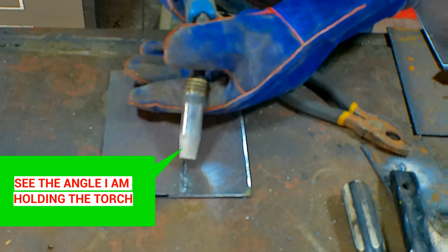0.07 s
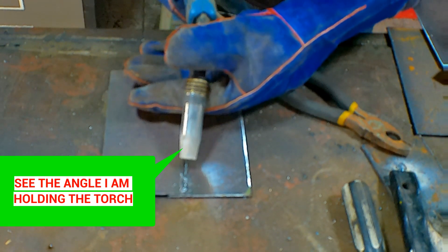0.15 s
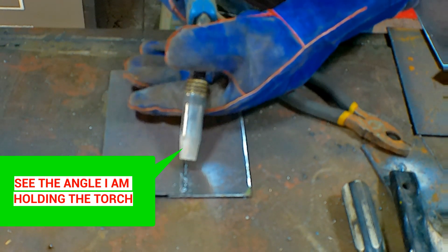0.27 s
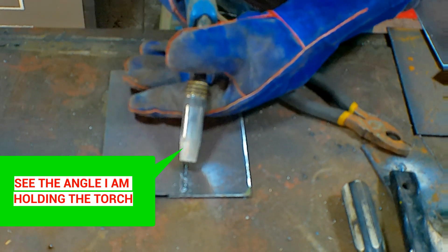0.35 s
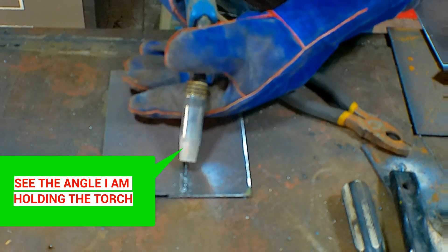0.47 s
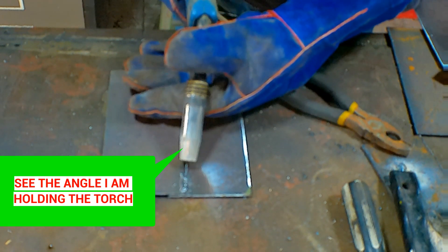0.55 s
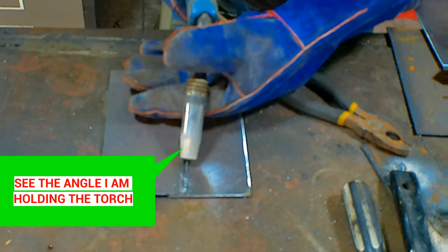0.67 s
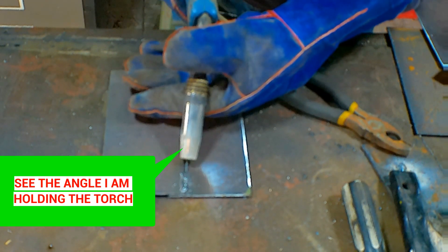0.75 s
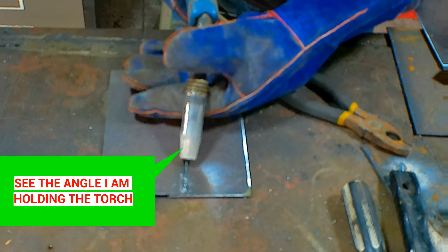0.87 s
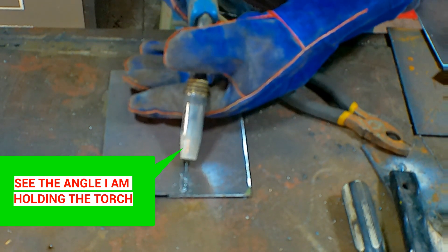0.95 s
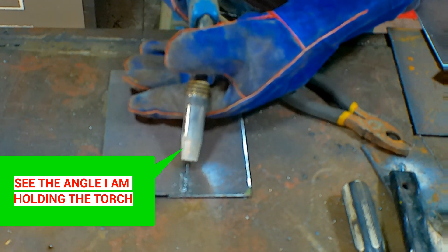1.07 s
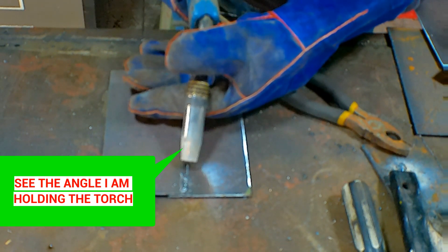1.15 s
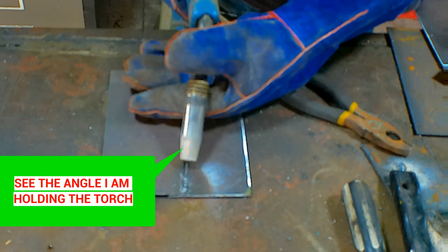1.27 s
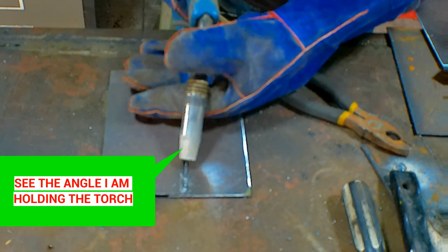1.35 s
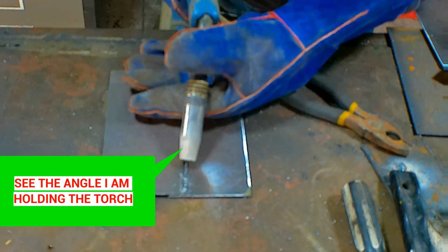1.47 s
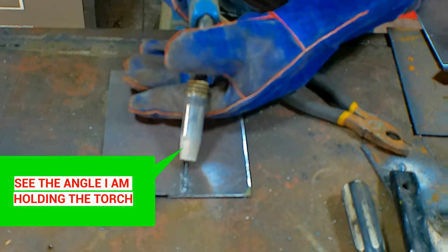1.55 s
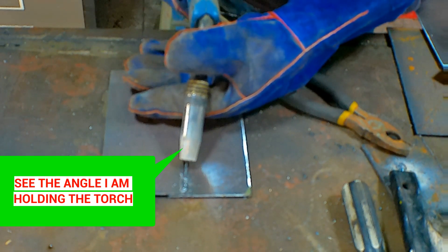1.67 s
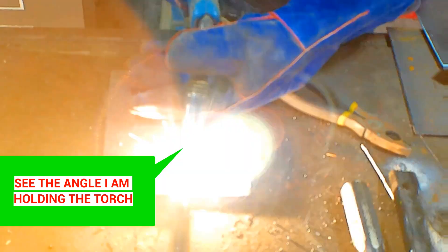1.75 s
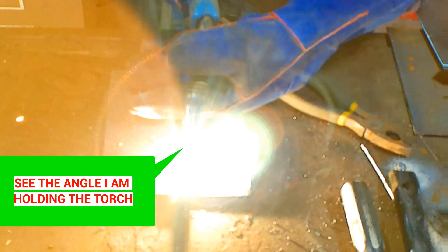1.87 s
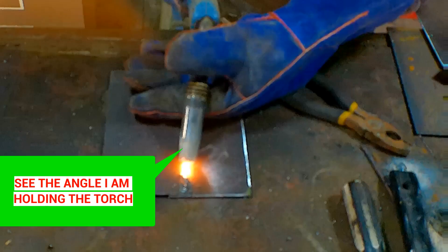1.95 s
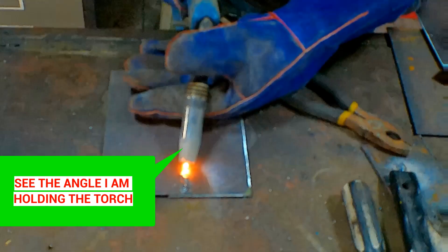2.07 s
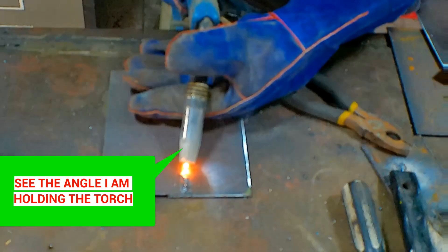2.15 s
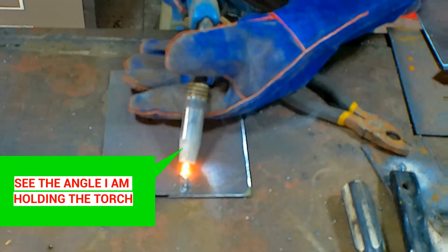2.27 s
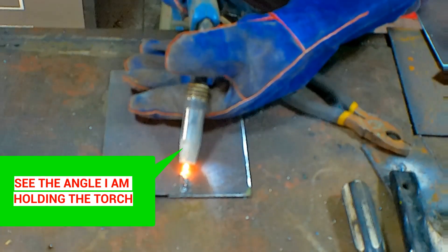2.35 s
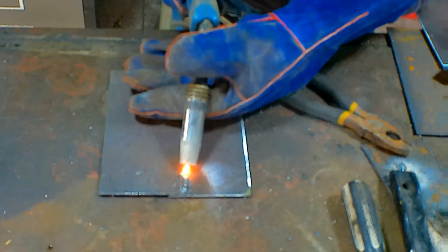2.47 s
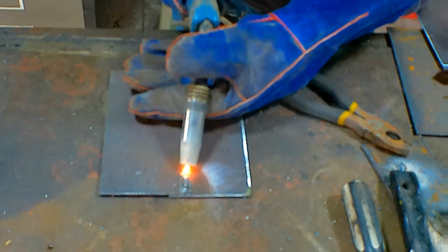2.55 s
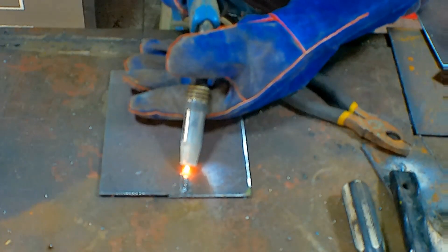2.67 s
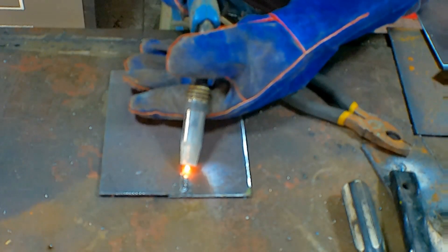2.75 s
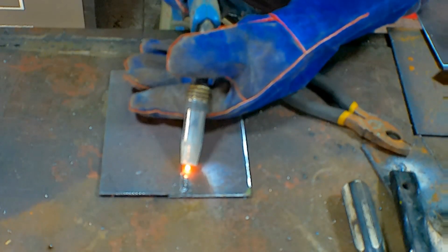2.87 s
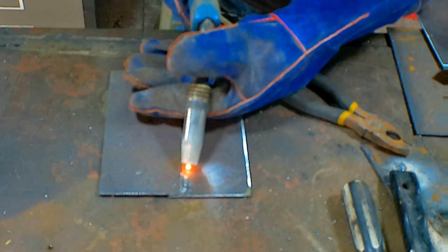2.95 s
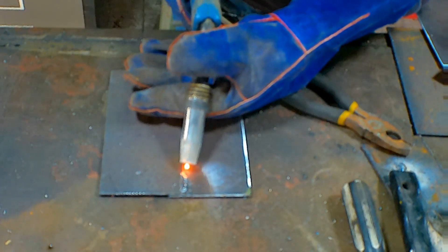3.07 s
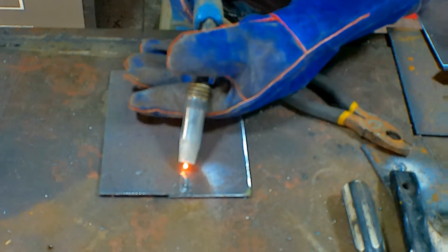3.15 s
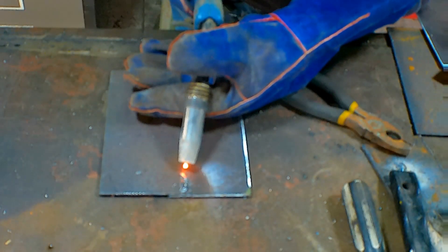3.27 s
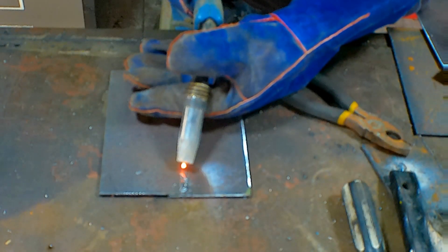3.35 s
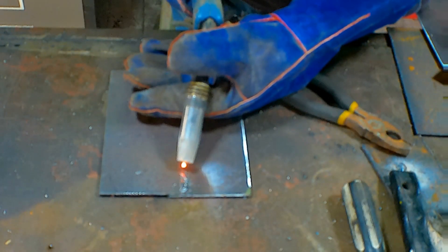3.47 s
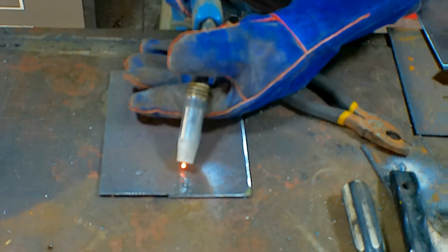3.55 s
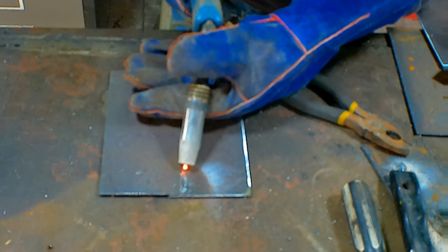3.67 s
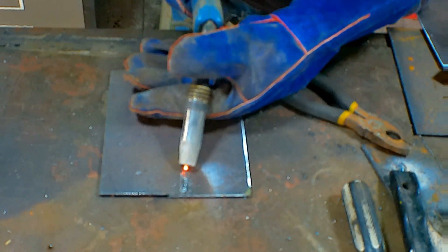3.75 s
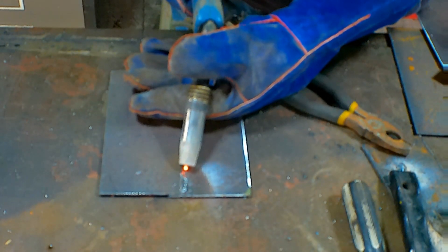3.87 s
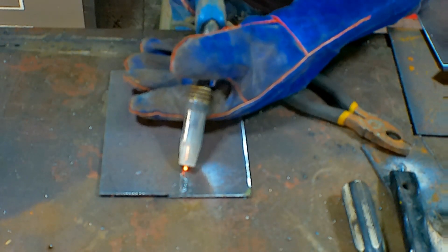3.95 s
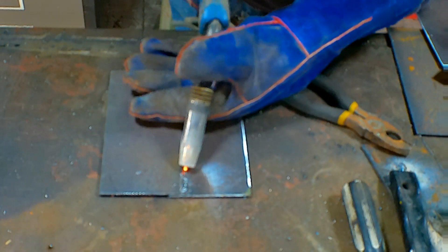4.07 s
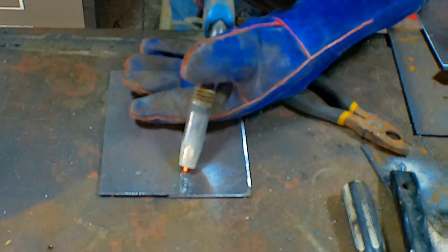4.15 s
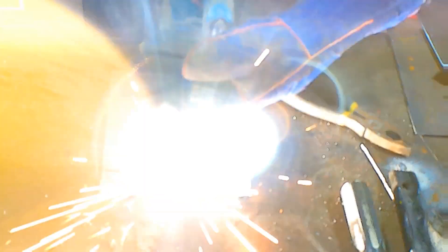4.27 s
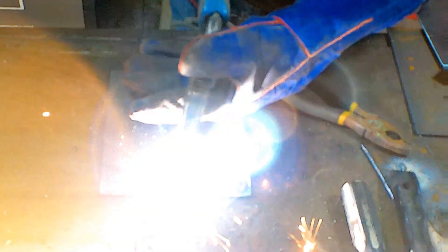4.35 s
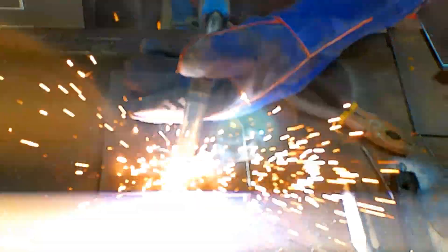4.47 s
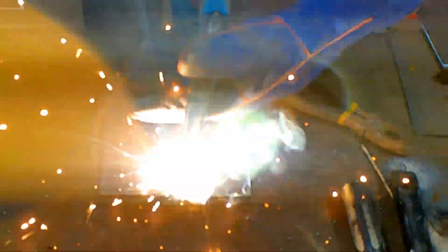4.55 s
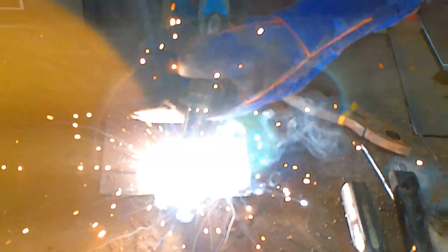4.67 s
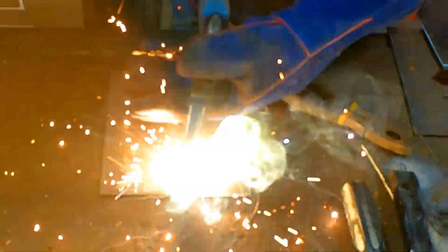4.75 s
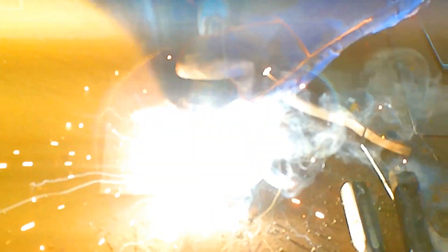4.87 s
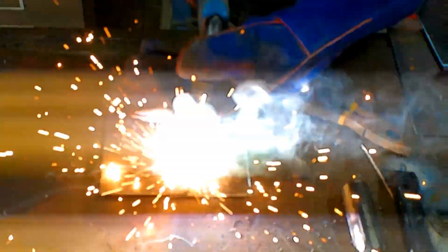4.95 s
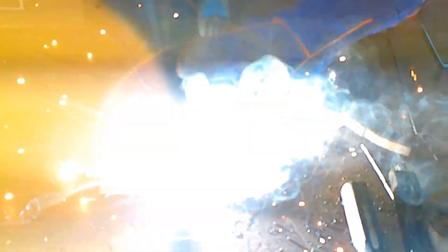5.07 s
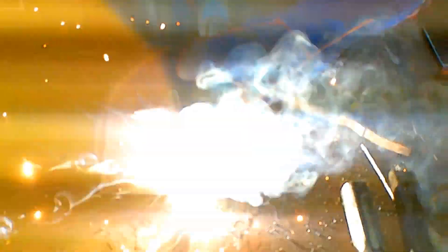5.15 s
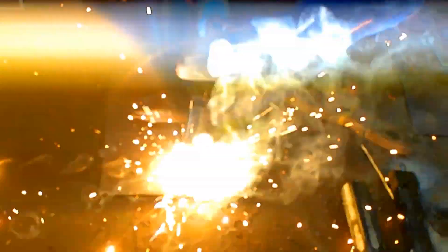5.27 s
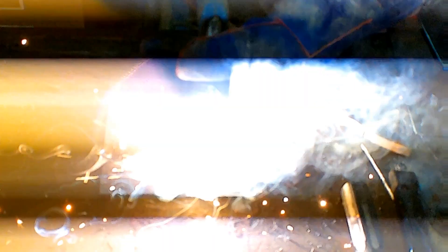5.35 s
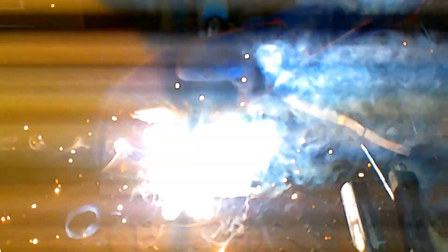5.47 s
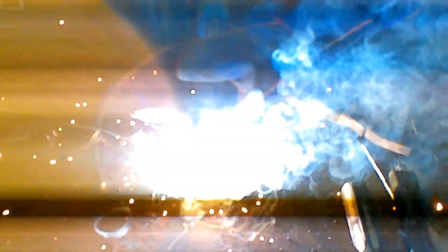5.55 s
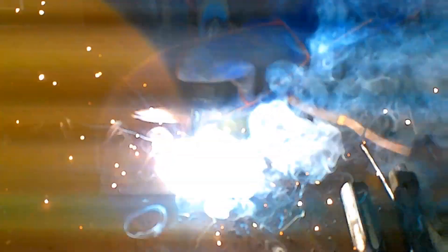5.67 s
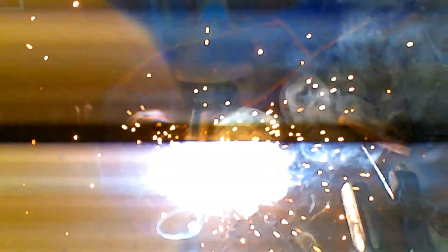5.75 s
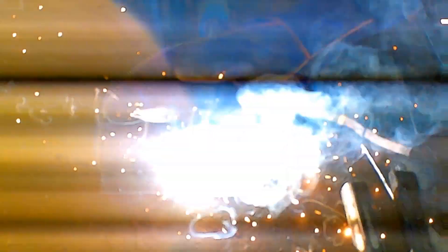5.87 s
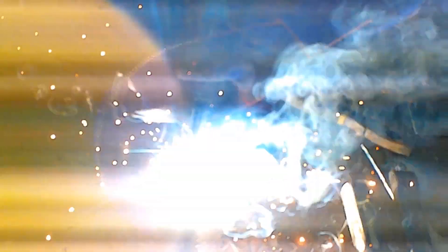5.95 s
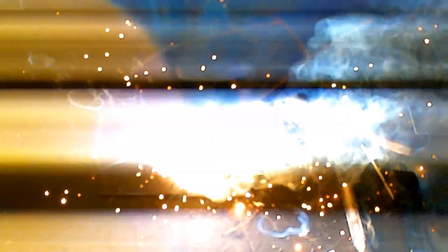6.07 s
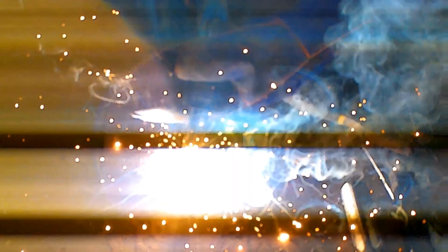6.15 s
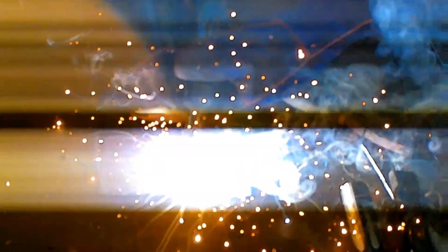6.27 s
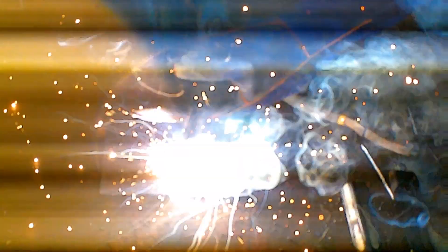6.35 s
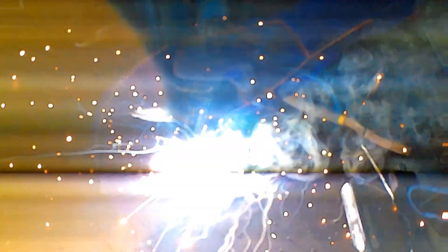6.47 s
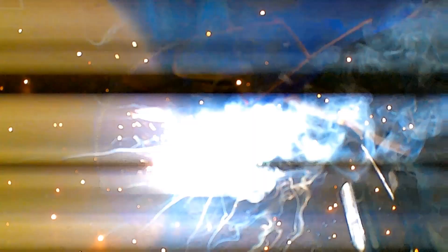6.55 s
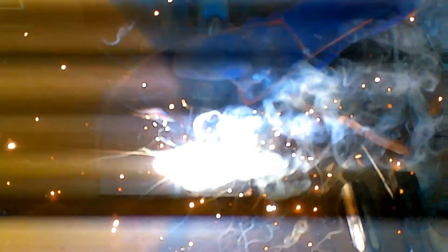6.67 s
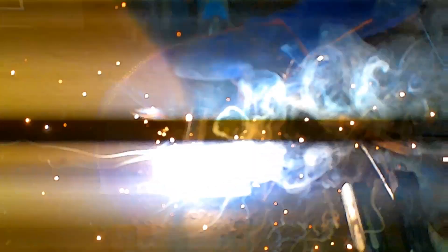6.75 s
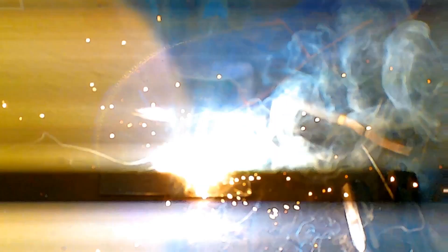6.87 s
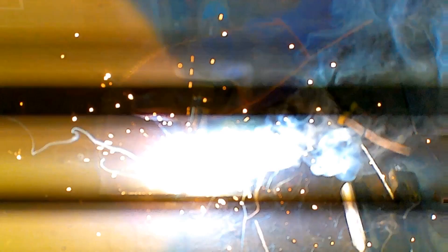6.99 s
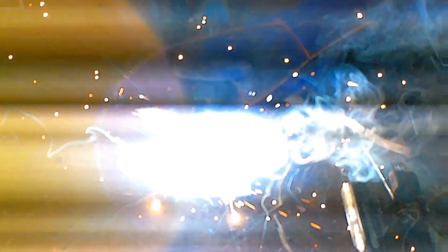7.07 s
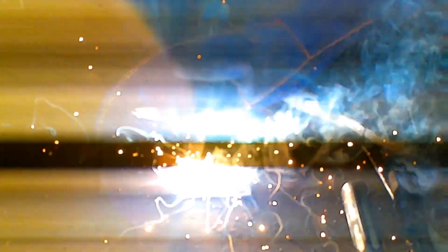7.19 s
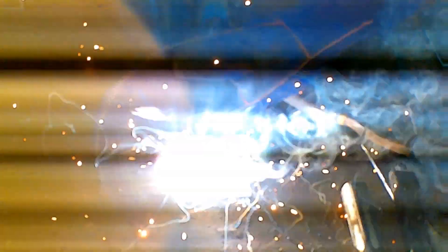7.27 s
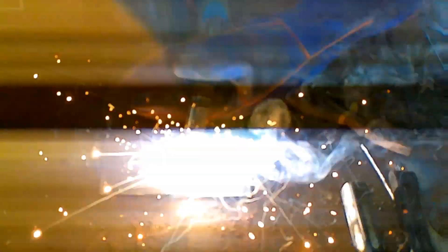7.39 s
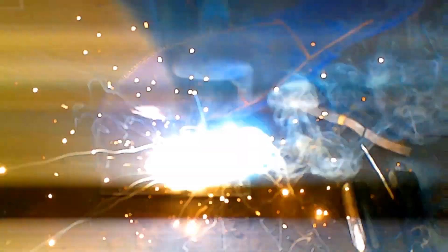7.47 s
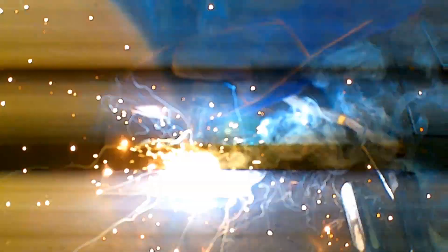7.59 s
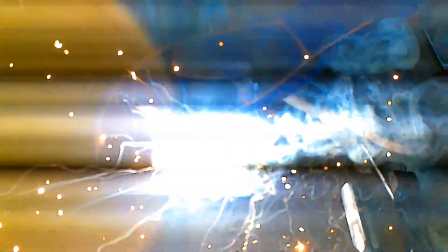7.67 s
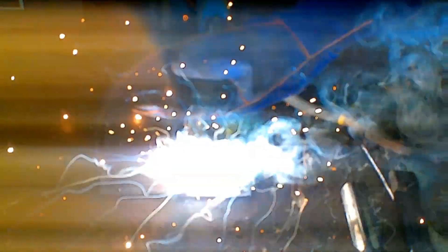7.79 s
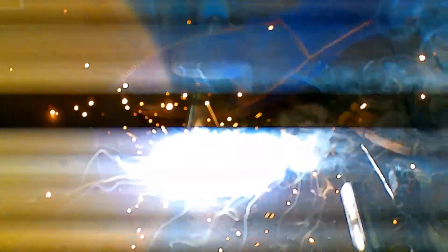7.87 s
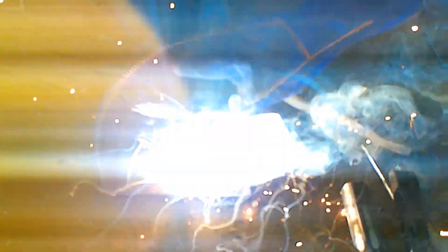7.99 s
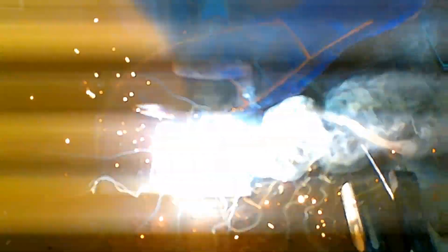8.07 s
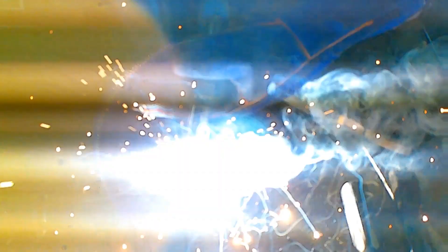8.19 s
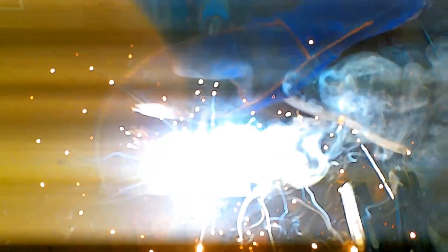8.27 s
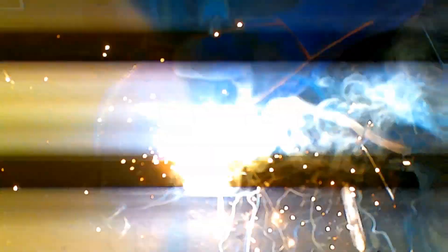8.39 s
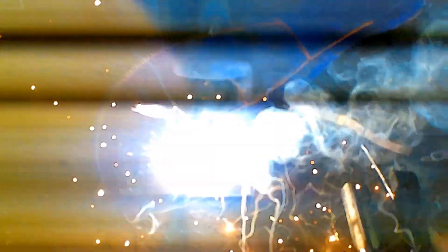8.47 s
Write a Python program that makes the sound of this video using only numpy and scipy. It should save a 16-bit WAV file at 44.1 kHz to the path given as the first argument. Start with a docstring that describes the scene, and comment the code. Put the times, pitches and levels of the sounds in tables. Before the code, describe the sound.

A low fan drone with light metallic ticks and two soft knocks, heard near a welding plate. One abrupt, explosive pop breaks the quiet, then the fan returns with a very faint high whine that drops out briefly. Later the arc bursts on, stuttering with gaps and loud distorted snaps, then becomes a continuous gritty frying buzz with stray big pops and brief lulls. Close microphone, short room reflections.

```python
"""Flux-core welding on a steel plate, heard close up in a workshop where a fan runs.
The torch is shifted into place, the wire strikes once and blows off with a bang; later the arc catches,
sputters and settles to a crackle. The arc is spikes, spray noise and fizz in one pulse colour.
Touches are noise bursts in resonances, the fan is coloured noise with hum, the whine is sine tones.
Plate, bench and room throw the arc back, and whatever overloads the input is cut flat."""
import sys
import numpy as np
from scipy import signal
from scipy.fft import rfft, irfft
from scipy.io import wavfile

SR = 44100
rng = np.random.default_rng(int(sys.argv[2]) if len(sys.argv) > 2 else 0)


def to_wav(sig):
    """Store sig (one row per channel, or 1-D mono) as 16-bit WAV at the path in sys.argv[1].

    Samples outside -1..1 are clipped; the rate is SR.
    """
    pcm = np.clip(np.atleast_2d(sig), -1, 1) * 32767
    pcm = np.round(pcm).astype(np.int16)
    wavfile.write(sys.argv[1], SR, pcm.T)  # frames by channels


N = 375732
TIME = np.arange(N) / SR


def amp(db):
    """Decibels to gain."""
    return 10 ** (np.asarray(db) / 20)


def evened(x):
    """Scales to rms 1."""
    return x / np.sqrt(np.mean(x ** 2) + 1e-20)


def read(points, hz):
    """Reads a table on a log-frequency axis."""
    f, value = np.transpose(points)
    return np.interp(np.log(hz + 1), np.log(f + 1), value)


def add(mix, s, sound):
    """Mixes a sound in at time s."""
    part = mix[max(round(s * SR), 0):][:len(sound)]
    part += sound[:len(part)]


def smooth(x, hz):
    """One-pole low-pass."""
    r = np.exp(-2 * np.pi * hz / SR)
    return signal.lfilter([1 - r], [1, -r], x)


def resonate(x, hz, width):
    """A resonance of gain 1."""
    return signal.lfilter(*signal.iirpeak(hz, hz / min(width, SR / 4), SR), x)


def drift(hz, size=2 ** 13):
    """Slow chance of rms 1, up to the given rate."""
    points = rng.standard_normal(size)
    return evened(np.interp(TIME * 2 * hz, np.arange(size), points))


def tones(lines, waver_hz, waver_db):
    """Lines with a quick jitter in pitch and a slow waver in strength."""
    out = np.zeros(N)
    for hz, db in lines:
        level = amp(db + waver_db * drift(hz=4.3))
        phase = 2 * np.pi * np.cumsum(hz + waver_hz * drift(hz=140)) / SR
        out += level * np.sqrt(2) * np.sin(phase)
    return out


def wander(x, response, count=4):
    """Hot air and the moving torch change the scattered paths: x fades between random responses."""
    shares = np.array([drift(hz=12) for _ in range(count)])
    shares /= np.linalg.norm(shares, axis=0)
    out = np.zeros(N)
    for share in shares:
        path = response()
        out += signal.oaconvolve(x * share, path / np.linalg.norm(path))[:N]
    return out


# ring of the workshop: pitch_hz, t60_s
ROOM_RING = [(150, 0.31), (600, 0.23), (1500, 0.23), (4000, 0.37), (9000, 0.23), (15000, 0.34)]


def workshop(first_s=0.0076):
    """Dense reflections that build up from the nearest wall, each band dying at its own speed."""
    hz, t, bands = signal.stft(rng.standard_normal(SR // 2), SR, nperseg=2 ** 8)
    dying = bands * amp(-60 * t / read(ROOM_RING, hz)[:, None])
    tail = signal.istft(dying, SR, nperseg=2 ** 8)[1]
    return tail * np.minimum(np.arange(len(tail)) / SR / first_s, 1) ** 3


# tone of the fan's rush: pitch_hz, relative_db (per Hz)
FAN_TONE = [(20, 5), (55, 0.5), (100, -0.5), (175, 4.5), (230, -1), (500, 2.5), (1150, -0.5), (1450, -7),
            (2300, -11), (3500, -16), (5000, -22), (7000, -28), (10000, -30), (15500, -31)]
# swell of the rush around its base level: time_s, swell_db
FAN_SWELL = [(0, -4.5), (1.6, -5.5), (2.1, -4), (4.2, -3.5)]
# hum of blades and motor, each line wavering: pitch_hz, level_db (rms before the waver)
FAN_HUM = [(177.6, -52), (253, -54.5), (290.7, -52), (403.7, -52), (506, -73), (602.9, -51), (866.7, -55.5),
           (1157, -68), (1206, -55)]


def fan(rush_db=-35, hum_db=0):
    """Rushing air is shaped noise with a slow swell; blades and motor hum in wavering tones."""
    spectrum = rfft(rng.standard_normal(N))
    rush = evened(irfft(spectrum * amp(read(FAN_TONE, np.fft.rfftfreq(N, 1 / SR))), N))
    swell_db = np.interp(TIME, *np.transpose(FAN_SWELL))
    hum = tones(FAN_HUM, waver_hz=0.84, waver_db=2.1)
    return amp(rush_db + swell_db) * rush + amp(hum_db) * hum


# thin electrical whine: pitch_hz, level_db (rms before the waver)
WHINE_LINES = [(4680, -64), (5410, -62.5), (7250, -69), (10584, -71)]
# when the whine is switched on: start_s, end_s
WHINE_SPANS = [(1.85, 3.07), (3.28, 4.2)]


def whine():
    """A faint, fuzzy whine of jittering tones that comes and goes while the arc is out."""
    on = sum((TIME > start) & (TIME < end) for start, end in WHINE_SPANS)
    return smooth(on, hz=8) * tones(WHINE_LINES, waver_hz=30.1, waver_db=0.5)


def rings(rows):
    """Each contact is a dying burst of friction in one steep resonance."""
    out, t = np.zeros(N), np.arange(SR // 3) / SR
    for s, db, hz, width, decay in rows:
        friction = rng.standard_normal(len(t))
        # two filters in a row, each twice the listed width
        ring = evened(resonate(resonate(friction, hz, 2 * width), hz, 2 * width))
        attack = 1 - np.exp(-t * 20 / decay)
        add(out, s, amp(db) * ring * np.exp(-t / decay) * attack)
    return out


def touches(events, modes, pivot_hz=3600):
    """Every touch rings all the modes of its object; brighter ones favour those above the pivot."""
    rows = []
    for s, db, bright, decay in events:
        for hz, width, mode_db in modes:
            level_db = db + mode_db + bright * np.log2(hz / pivot_hz)
            rows.append((s, level_db, hz, width, decay))
    return rings(rows)


# ticks and scrapes of the torch and its wire: start_s, level_db, brightness_db_per_octave, decay_s
TORCH_TICKS = [(.045, -47.5, 5, .013), (.125, -50, 3, .02), (.204, -52, -10, .02), (.284, -49, -4, 0.086),
               (.593, -45, 4, 0.013), (.615, -41, 2, 0.0093), (.759, -51, 3, .015), (.991, -34, 3, .007),
               (1.016, -40, 5, .011), (1.032, -45, -7, 0.022), (1.104, -41, 5, .009), (1.342, -48, 5, .011),
               (2.576, -45, -11, 0.012), (2.722, -52, 5, .01), (2.87, -44, -1, .01),
               (3.708, -33, -4.5, 0.0089), (3.779, -41.5, -5, .015), (3.8, -45, 3, .012)]
# what the torch rings with: pitch_hz, width_hz (nominal), relative_db
TORCH_MODES = [(1650, 500, -4.5), (2410, 250, 1), (5200, 790, -4), (6860, 6000, -4)]
# soft knocks as the hand settles: start_s, level_db, brightness_db_per_octave, decay_s
PLATE_KNOCKS = [(.835, -35, 3, 0.025), (1.03, -35.5, 1.5, 0.062)]
# what the plate rings with: pitch_hz, width_hz (nominal), relative_db
PLATE_MODES = [(300, 96, -3), (800, 64, 2.5), (1600, 770, -3.5)]


def handling():
    """Ticks and scrapes ring the torch; soft knocks ring the plate."""
    return touches(TORCH_TICKS, TORCH_MODES) + touches(PLATE_KNOCKS, PLATE_MODES)


# flares, puffs and spits: start_s, level_db (before the decay), pitch_hz, width_hz (nominal), decay_s
WIRE_STRIKES = [(1.7657, -11, 8600, 6000, 0.0072), (1.767, -7, 2520, 500, 0.0065),
                (1.767, -12, 1620, 200, 0.0074), (1.767, -21, 650, 700, 0.023),
                (1.8104, -4.5, 800, 496, 0.0029), (1.811, -14, 278, 200, 0.0038),
                (1.82, -17.5, 5960, 3500, 0.031), (1.96, -45, 9000, 2000, .05),
                (2.0202, -22.5, 6900, 8600, 0.0013), (4.267, -11.5, 2380, 600, 0.0074),
                (4.279, -6, 1680, 180, 0.0082), (4.28, -17, 574, 400, 0.046)]


def wire_strikes():
    """The cold wire touches the plate, flares, puffs and spits in short resonant bursts."""
    return rings(WIRE_STRIKES)


def blast(crack, thump, crack_hz=1500, thump_hz=3500, thump_db=7):
    """An arc pulse has a sharp front and a slower push of hot gas."""
    front = crack - smooth(crack, crack_hz)
    push = smooth(smooth(thump, thump_hz), thump_hz)
    return front + amp(thump_db) * push


def snaps(per_s, spread_db, order=3):
    """Spikes of rms 1 at uneven gaps: a drop needs a while to grow before it shorts the arc."""
    gaps = rng.gamma(order, 1 / order, 2 ** 13)
    sizes = amp(spread_db * np.clip(rng.standard_normal(len(gaps)), -2, 2))
    at = (np.cumsum(gaps) * SR / per_s).astype(int)
    return evened(np.bincount(at[at < N], sizes[at < N], N))


def sizzle(spikes, fizz_db, spray_db, spray_hz, flutter_db):
    """Spikes, the spray of droplets after each, and the fluttering fizz of boiling flux."""
    spray = evened(smooth(spikes, spray_hz) * rng.standard_normal(N))
    flutter = amp(flutter_db * drift(hz=180))
    fizz = evened(rng.standard_normal(N) ** 3 * flutter)
    return evened(spikes + amp(spray_db) * spray + amp(fizz_db) * fizz)


# flares, in which the young arc catches and dies down again: start_s, length_s, relative_db
ARC_FLARES = [(4.263, 0.12, -17.5), (4.416, 0.042, -9.5), (4.484, 0.1, -8.5), (4.612, .03, -18),
              (4.657, .07, -10.5), (4.74, .02, -1), (4.79, 0.091, -30), (4.891, .085, -6),
              (5.005, 0.049, -7), (5.062, 0.038, -14), (5.167, .03, -21), (5.184, 0.14, -11.5),
              (5.388, 0.074, -10)]


def flares(rise_s=0.0076, sag_db=-14.5, out_s=.006):
    """Strength of the young arc: each flare rises quickly, sags over its length and goes out."""
    gain, t = np.zeros(N), np.arange(SR // 4) / SR
    for s, length, db in ARC_FLARES:
        rise = np.minimum(t / rise_s, 1)
        sag = amp(db + sag_db * t / length)
        going_out = np.exp(-np.maximum(t - length, 0) / out_s)
        add(gain, s, rise * sag * going_out)
    return gain


def sputter(thump_db=-14, thump_db_per_s=9, dull_hz=10000):
    """The young arc spits sharp spatter between its pops, and gains body as the metal heats up."""
    spikes = snaps(per_s=240, spread_db=5)
    crack = flares() * sizzle(spikes, fizz_db=-8.0, spray_db=-5, spray_hz=159, flutter_db=4.5)
    # body grows from the first flare until the arc settles
    first_s, settled_s = ARC_FLARES[0][0], SETTLED_ARC[0][0]
    heated_s = np.clip(TIME, first_s, settled_s) - first_s
    thump = amp(thump_db + thump_db_per_s * heated_s) * crack
    return blast(smooth(crack, dull_hz), thump)


# lulls, in which the arc runs long and quietens: start_s, length_s, depth_db
ARC_LULLS = [(5.684, 0.1, -8), (6.466, 0.073, -13), (6.539, .06, -7.5), (6.655, 0.056, -9.5),
             (7.728, 0.068, -5.5)]


def lull_db():
    """How far the settled arc drops below its usual level: each lull sinks and recovers in one arch."""
    return sum(db * np.sin(np.pi * np.clip((TIME - s) / length, 0, 1)) for s, length, db in ARC_LULLS)


# course of the settled arc: time_s, relative_db, thump_db (relative to that level)
SETTLED_ARC = [(5.49, -8.5, -1.5), (5.9, -8.5, -11.5), (6.08, -5.5, -8), (6.4, -10.5, -5),
               (6.8, -8.5, -10.5), (7.2, -8, -8.5), (7.7, -9.5, -11), (8.0, -9, -13), (8.52, -9, -10.5)]


def burn(level_db=0, push_db=-1, uneven_db=2, lull_thinning=0.44):
    """The settled arc shorts over a hundred times a second, some snaps duller; lulls thin its thump."""
    s, db, body_db = np.transpose(SETTLED_ARC)
    lull = lull_db()
    gain = amp(level_db + np.interp(TIME, s, db) + lull) * (TIME >= s[0])
    spikes = snaps(per_s=180, spread_db=2.0)
    crack = gain * sizzle(spikes, fizz_db=-2.0, spray_db=2.5, spray_hz=135, flutter_db=1)
    thump_db = push_db + np.interp(TIME, s, body_db) + lull_thinning * lull + uneven_db * drift(hz=97.2)
    return blast(crack, gain * spikes * amp(thump_db))


def chance_pops(per_s=22, crack_db=5, crack_spread_db=2, thump_db=-5.5, thump_spread_db=3,
                count=160, order=3):
    """Now and then a larger drop shorts the settled arc, except in a lull."""
    times = SETTLED_ARC[0][0] + np.cumsum(rng.gamma(order, 1 / order, count)) / per_s
    crack, thump = np.clip(rng.standard_normal((count, 2)), -2, 2).T
    rows = zip(times, crack_db + crack_spread_db * crack, thump_db + thump_spread_db * thump)
    return [row for row in rows
            if not any(s < row[0] < s + length for s, length, _ in ARC_LULLS)]


# pops that stand out, each a burst bridge of molten wire:
# start_s, crack_db (relative), thump_db (relative to the crack)
BIG_POPS = [(1.8101, 3.5, -2.5), (4.2675, 2, -7), (4.2815, 4, -4), (4.294, 0, -15), (4.3137, 2, -4),
            (4.4315, -2, -16), (4.4575, 3, -6), (4.4884, -3, -14), (4.501, 2.5, -22), (4.5328, 5.5, -9),
            (4.5987, 0, -4), (4.609, 6.5, -6.5), (4.6449, 2, 0.5), (4.666, 1, -1), (4.6777, 2.5, -2),
            (4.6974, -4.5, 5), (4.7404, 1.5, -2), (4.7508, 10.5, -20), (4.7825, 2.5, -3), (4.8037, 4.5, -5),
            (4.819, -5, 3.5), (4.8838, 10.5, -2.5), (4.9671, -6.5, 11.5), (4.9944, 4, -2),
            (5.0211, 5, -0.5), (5.0341, 4.5, -2), (5.0591, 3.5, -16), (5.0802, -4, 2.5), (5.1003, -6.5, 0),
            (5.1769, 8.5, 0.5), (5.259, 0.5, 4.5), (5.2678, 3.5, 3), (5.2821, 1, -1), (5.3006, 2.5, 1.5),
            (5.319, 5, -11), (5.3505, -2, 2.5), (5.385, 3, -10), (5.4153, 6, -2), (5.4232, 7.5, -12),
            (5.4327, 7.5, -2.5), (5.444, -1, 3), (5.4765, 3.5, -20), (5.7897, -3.5, 4), (5.8287, 2, -14),
            (6.2524, 6, 0), (6.335, 7, 0), (6.483, 6.5, -5), (6.5101, 6, -8), (6.5281, 9, -4),
            (6.5926, 0, -6), (6.6979, 6, -4), (7.3228, 10, -11), (7.971, 12, -6.5), (8.1347, 4, -23)]


def pops(level_db=12, spray_db=-3, spray_s=0.0011, growth=0.23):
    """Each bridge bursts with one spike and a spray of droplets; big ones spray longer."""
    crack, thump, t = np.zeros(N), np.zeros(N), np.arange(2 ** 9) / SR
    spike = t == 0
    for s, db, thump_db in BIG_POPS + chance_pops():
        spray = rng.standard_normal(len(t)) * np.exp(-t / (spray_s * amp(growth * db)))
        add(crack, s, amp(db) * (spike + amp(spray_db) * spray / np.linalg.norm(spray)))
        add(thump, s, amp(db + thump_db) * spike)
    return amp(level_db) * blast(crack, thump)


def shrill(x, edge_hz=8850, edge_width=750, edge_db=0, fades=(5.0, 5.6)):
    """Until the weld pool has formed, every spit has a shrill edge."""
    young = x * np.interp(TIME, fades, (1, 0))
    return x + amp(edge_db) * resonate(young, edge_hz, edge_width)


# colour of an arc pulse: pitch_hz, relative_db
ARC_TONE = [(25, -21), (100, -13), (220, -1.5), (500, -0.5), (800, 3), (1100, 0.5), (1350, -3.5),
            (2600, 0.5), (3700, -3.5), (5500, 0.5), (8000, -4), (10000, -2), (12800, -8.5), (16000, -11.5)]
# resonances and hollows of the nozzle and the gap over the plate: pitch_hz, width_hz, lift_db
NOZZLE_HOLLOWS = [(305, 110, 2), (784, 65, 1.75), (1753, 57, 2.5), (2750, 420, 2), (3640, 160, -4.5),
                  (4200, 100, -1), (5080, 480, -2), (6000, 150, 0), (10270, 720, 2)]


def colour(x, size=4096):
    """The arc's spectrum as a causal filter; each pulse starts with a negative swing."""
    hz = abs(np.fft.fftfreq(size, 1 / SR))
    db = read(ARC_TONE, hz)
    for f, width, lift in NOZZLE_HOLLOWS:
        db = db + lift / (1 + (2 * (hz - f) / width) ** 2)
    # minimum phase: all the energy as early as the spectrum allows
    spectrum = np.exp(np.conj(signal.hilbert(np.log(amp(db)))))
    pulse = np.fft.ifft(spectrum).real[:size // 2]
    return -signal.oaconvolve(x, pulse / np.linalg.norm(pulse))[:N]


def arc(level_db=-1):
    """Pops, sputter and burn share one shrill edge and one pulse colour."""
    return amp(level_db) * colour(shrill(pops() + sputter() + burn()))


# reflections from plate, bench, glove and wall: delay_ms, pressure_share (of the short waves)
BENCH_ECHOES = [(.70, .22), (1.86, .33), (2.8, .1), (10.35, .17)]


def bench(x, clutter_db=-9, clutter_s=0.0013, small_hz=1100):
    """Distinct echoes return only short waves, as small things do; tools around scatter the whole sound."""
    t, short = np.arange(2 ** 10) / SR, x - smooth(x, small_hz)
    echoes = np.zeros(N)
    for ms, share in BENCH_ECHOES:
        add(echoes, ms / 10 ** 3, share * short)
    clutter = wander(x, lambda: rng.standard_normal(len(t)) * t * np.exp(-t / clutter_s))
    return x + echoes + amp(clutter_db) * clutter


def scene(arc_room_db=-6, strike_room_db=-9, handling_room_db=-7):
    """Arc, wire and handling in the workshop, over the fan and the whine."""
    weld, strikes, touched = arc(), wire_strikes(), handling()
    into_room = amp(arc_room_db) * weld + amp(strike_room_db) * strikes + amp(handling_room_db) * touched
    echo = wander(into_room, workshop)
    return (fan() + whine() + echo + touched + strikes + bench(weld))[None]


def record(dry, edge_hz=15800):
    """Whatever overloads the input, as the pops do, is cut flat; then the band limit."""
    clipped = np.clip(dry, -1, 1)
    band = signal.firwin(511, edge_hz, window=("kaiser", 9), fs=SR)
    return signal.oaconvolve(clipped, band[None], "same")


dry = scene()
out = record(dry)
to_wav(out)
```